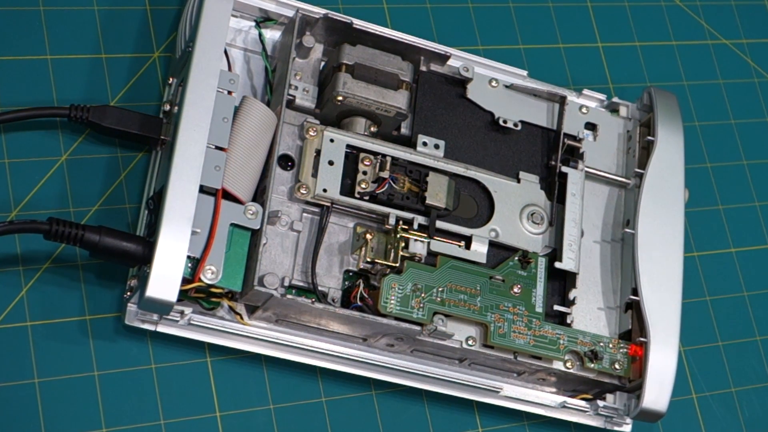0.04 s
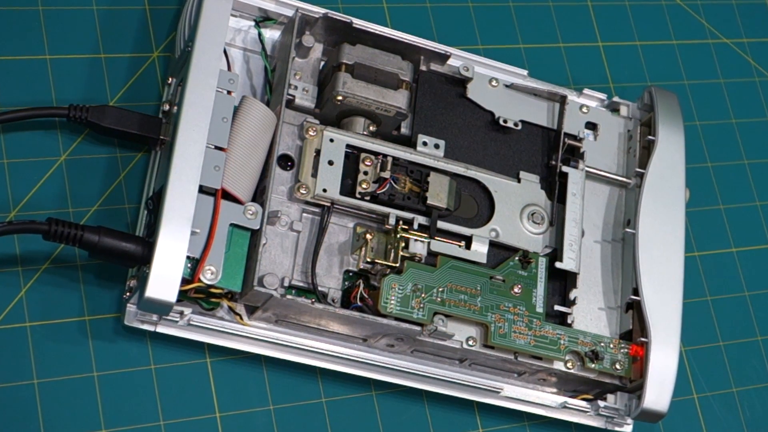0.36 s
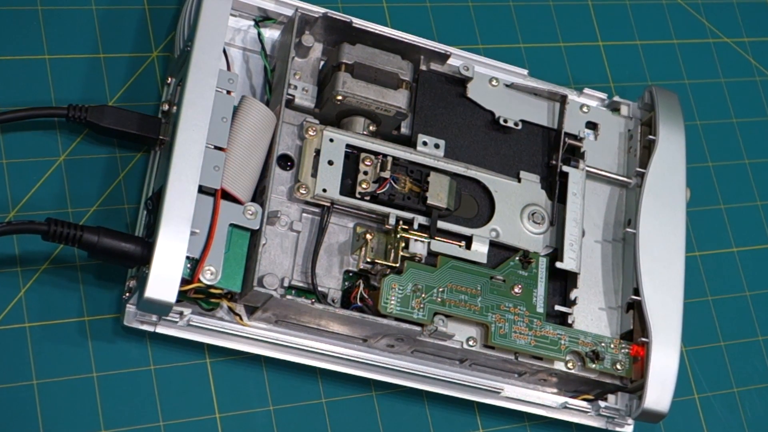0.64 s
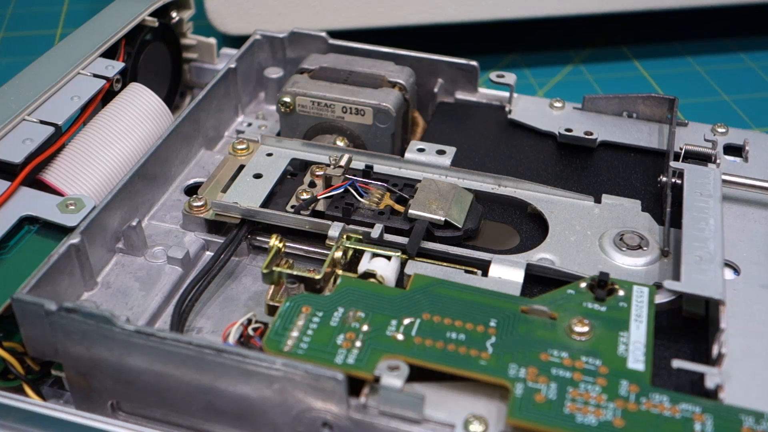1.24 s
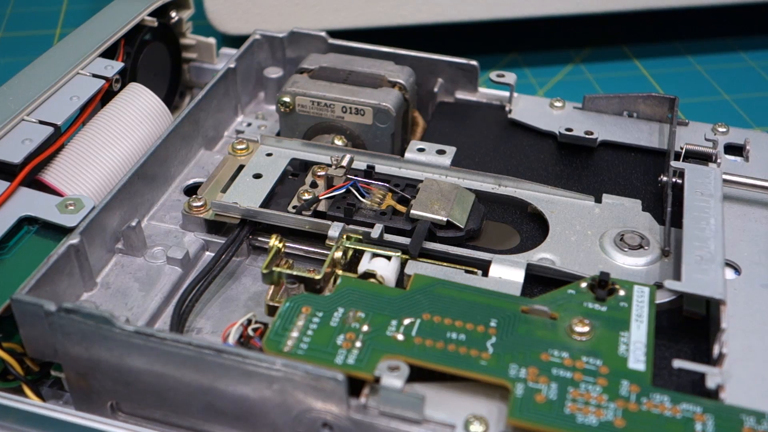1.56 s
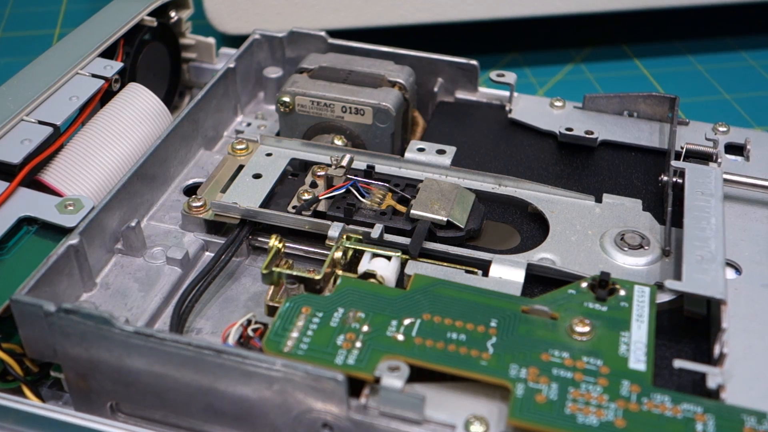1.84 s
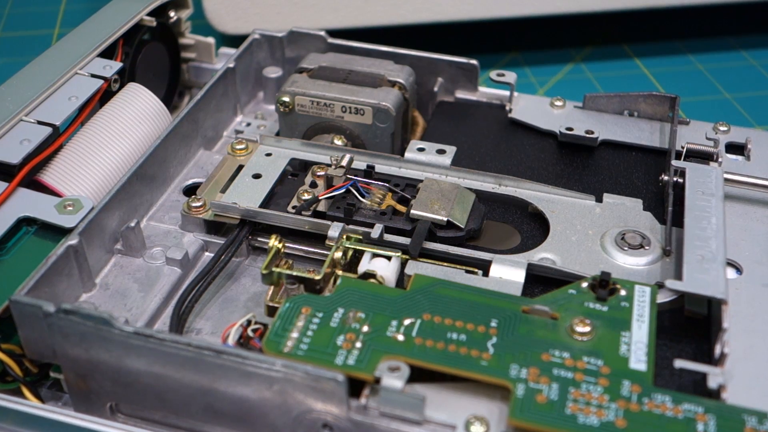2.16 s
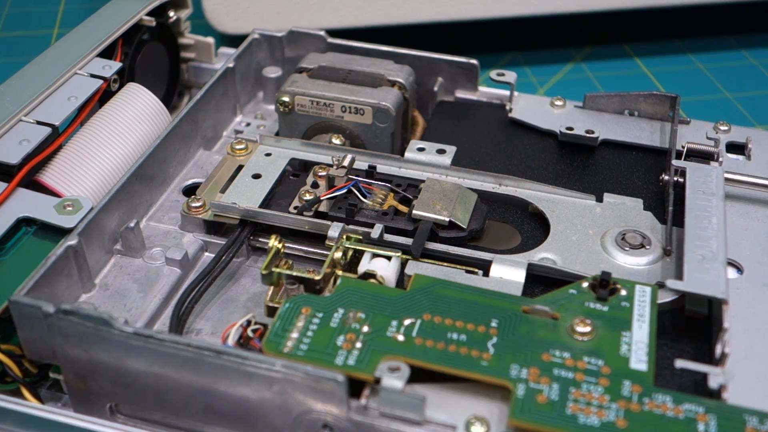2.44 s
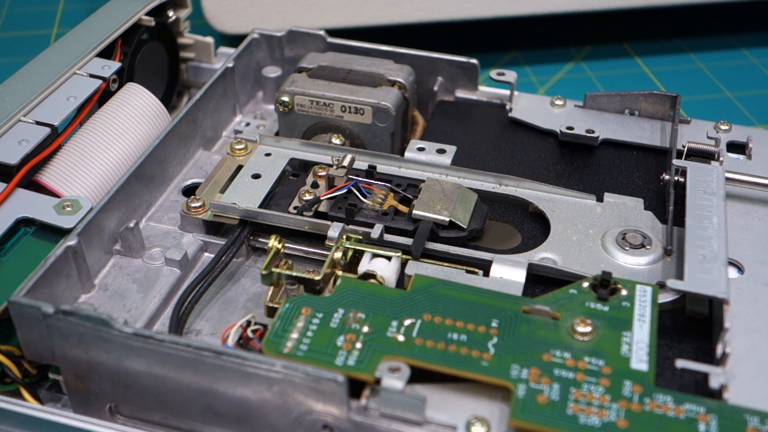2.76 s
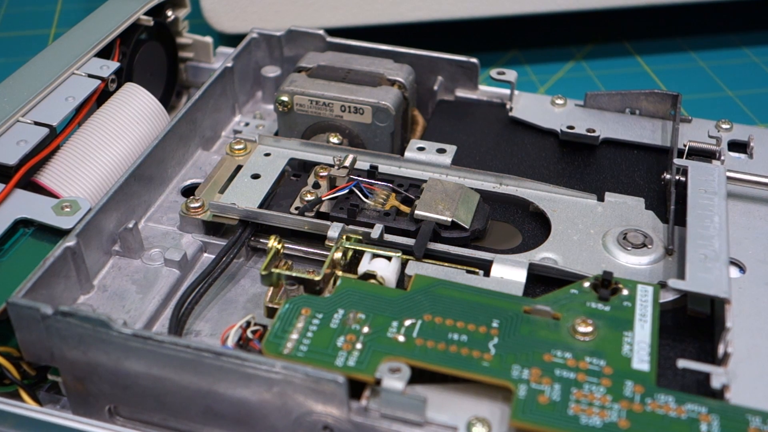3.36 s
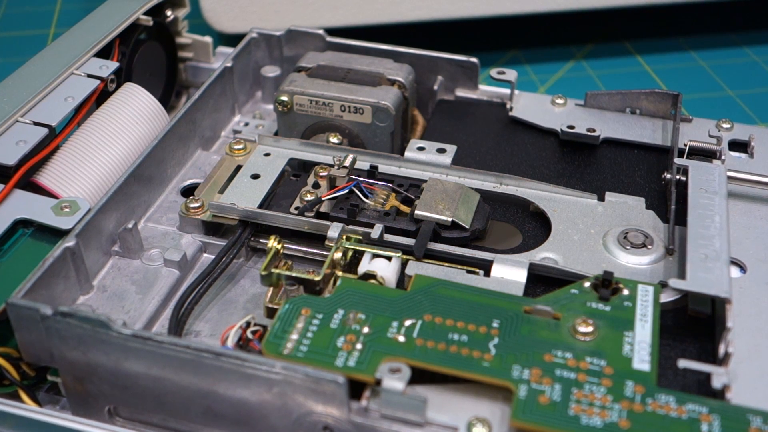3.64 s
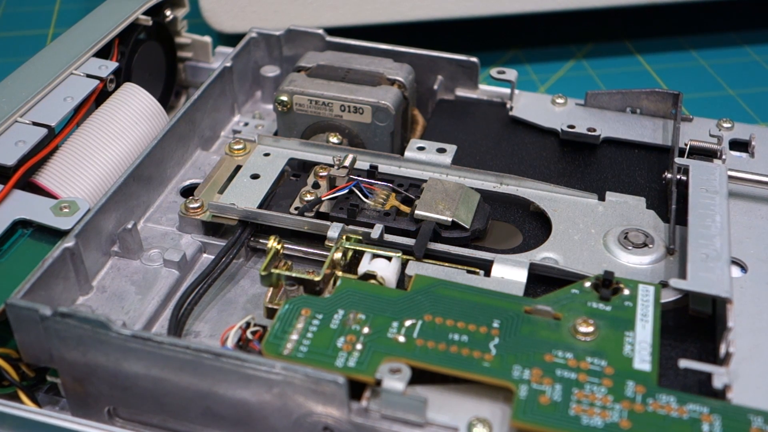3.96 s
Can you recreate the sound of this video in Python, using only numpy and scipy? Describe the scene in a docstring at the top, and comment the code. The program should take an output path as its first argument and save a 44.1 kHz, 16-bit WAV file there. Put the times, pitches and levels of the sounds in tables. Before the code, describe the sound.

An open floppy disk drive whirs with fast knocking and four head-step clacks.

```python
"""A fast knocking over a whirring belt is heard first: an open floppy disk drive, running close by.
The motor knocks into the chassis once a turn. The belt's rough patches come round every lap,
and the disk rubs in its jacket with every turn of the spindle. Four times there is a clack as
the stepper motor jerks the head carriage on by one track. Low room rumble lies underneath."""
import sys
import numpy as np
from scipy import signal
from scipy.fft import rfft, irfft, next_fast_len
from scipy.io import wavfile
from scipy.ndimage import map_coordinates

SR = 44100
rng = np.random.default_rng(int(sys.argv[2]) if len(sys.argv) > 2 else 0)


def to_wav(s):
    """Save 16-bit WAV."""
    ch = np.atleast_2d(s).T  # columns
    pcm = np.round(np.clip(ch, -1, 1) * 32767)  # PCM
    wavfile.write(sys.argv[1], SR, pcm.astype(np.int16))


N = 176400

MOTOR_HZ = 32.308  # turns a second
BELT_HZ, SPINDLE_HZ = MOTOR_HZ / 9, MOTOR_HZ * 5 / 27
FIRST_KNOCK_S, REBOUND_S = .0136, .016  # a rebound follows each knock by about half a turn

# A "colour" says which pitches come out stronger or weaker than the rest.
# room rumble and hiss: pitch_hz, level_db
ROOM_COLOUR = [(20, -26), (32, -10.5), (44, 2.5), (62, -6), (90, -4.5), (115, -10), (165, -10.5),
               (205, -7.5), (260, -10), (700, -17), (1800, -31.5), (4500, -37.5), (6000, -50), (8500, -49),
               (9700, -46), (10800, -51.5), (12300, -48), (14000, -62), (15500, -66)]
# the disk rubbing in its jacket: pitch_hz, level_db
JACKET_COLOUR = [(200, -15), (330, 0), (700, -3.5), (950, 1), (1150, -9.5), (1550, -20), (1780, -18),
                 (2100, -10.5), (2450, 0), (3100, -19.5), (3650, -27), (3780, -18.5), (3950, -30),
                 (4350, -26.5), (4700, -20.5), (5200, -22.5), (5800, -33.5), (8500, -40), (9700, -34.5),
                 (11000, -54), (15000, -47)]
# the belt running over its pulleys: pitch_hz, level_db
BELT_COLOUR = [(150, -54.5), (280, -19.5), (335, -1.5), (365, -9.5), (398, 0.5), (430, -8), (452, -6.5),
               (475, -10.5), (495, -13), (523, -1), (550, -12), (600, -4), (645, -9), (675, -21),
               (770, -19.5), (820, -5.5), (890, -7.5), (1020, -10.5), (1100, -27), (2000, -57.5),
               (8000, -94.5)]
# the motor's brushes: pitch_hz, level_db
BRUSH_COLOUR = [(300, -50), (600, -25), (850, 7.5), (1030, 7.5), (1120, -5.5), (1600, -5), (1720, -16.5),
                (2060, -4), (2210, -4), (2420, 4), (2590, 0.5), (2720, -12.5), (3050, -11), (3400, -22.5),
                (4700, -30), (5800, -31.5), (15000, -51.5)]
# the chassis when knocked: pitch_hz, level_db
CHASSIS_COLOUR = [(200, -48.5), (320, -10), (600, -13), (690, -33.5), (770, -21), (815, -3), (875, 1),
                  (940, -5.5), (1030, -11), (1090, -29.5), (1700, -40.5), (2450, -31), (3000, -53),
                  (6000, -80.5), (15000, -100)]
# the head carriage when tapped: pitch_hz, level_db
CARRIAGE_COLOUR = [(60, -8), (190, 3.5), (290, -18), (600, 2.5), (900, -2), (1180, -13), (1280, -5),
                   (1420, -1.5), (1750, -11), (2060, 1.5), (2300, -1), (2900, -18), (3600, -8), (4100, -16),
                   (4600, -12.5), (5500, -31.5), (9000, -33), (15000, -55)]
# the carriage scraping along its rails: pitch_hz, level_db
RAIL_COLOUR = [(60, -3), (190, 8.5), (290, -0.5), (600, -20), (900, 5.5), (1450, 0.5), (1750, -13.5),
               (2100, -5), (2900, -17), (4600, -25), (5800, -45), (15000, -64)]
# tones of belt and motor: rough_pitch_hz, start_level_db, growth_db_per_s
RUNNING_TONES = [(398, -49.5, -6), (402, -38, -2), (453.5, -50.5, -3), (452, -46.5, 3.44), (518.7, -47, 3),
                 (525.5, -44, -1), (528.7, -48, 0.5), (597, -43.5, -0.5), (610, -48.5, 2), (822, -41.5, -3),
                 (870.8, -40.5, 0), (872.3, -50, 3), (881, -45, 2.5), (2570, -60.5, 1.5)]
# knock strength on the nine motor turns of one belt lap: extra_db
LAP_ACCENTS = [3.5, 7, 3.5, 1.5, -2.5, 2.5, 2, 5, -0.5]
# knocks that are harder or softer than usual: near_time_s, extra_db
ODD_KNOCKS = [(.324, -19), (.355, 7), (.572, 8), (.603, -5), (.726, 11), (.85, 6), (.882, -4), (.913, 7),
              (1.006, 5.5), (1.161, -7), (1.562, 6), (1.87, 5), (2.055, 5), (2.088, 9.5), (2.149, 3),
              (2.428, 5), (2.49, 9), (2.552, -5), (2.706, 5), (2.737, 4.5), (2.768, 6.5), (2.83, -2),
              (2.892, 9), (3.016, 3.5), (3.046, 11.5), (3.294, 3), (3.386, 2), (3.419, 7), (3.573, 7.5),
              (3.666, 1), (3.728, 8), (3.851, 4), (3.881, 10.5)]
# moves of the head: start_s, kick_db, rattle_db, stop_db, thump_db, ring_db
HEAD_STEPS = [(.4935, 2.5, -28, 6, -25, -38), (1.328, -3, -27.5, -10, -24.5, -45),
              (2.329, -0.5, -28.5, -1, -24.5, -45), (3.1645, 1, -27.5, 4.5, -25.5, -51)]
# low notes of the case rocking after a step: pitch_hz, level_db, fade_s (time to fall 60 dB)
CASE_NOTES = [(77.5, -4, 0.13), (108.6, 3.5, 0.24), (134.7, -9.5, 0.33), (173, -28, 0.046),
              (192, -7.5, 0.16)]


def amp(db):
    """Turn decibels into a multiplier."""
    return 10 ** (np.asarray(db) / 20)


def unit(x):
    """Scale a sound to an average power of 1."""
    return x / np.sqrt(np.mean(x ** 2) + 1e-20)


def clock():
    """The time of each sample, in seconds."""
    return np.arange(N) / SR


def wobble(rate):
    """A smooth curve through rate random points a second."""
    return map_coordinates(rng.standard_normal(int(N * rate / SR) + 4), [clock() * rate])


def through(x, colour, size=16384):
    """Play x through an object with the given colour."""
    hz, db = np.transpose(colour)
    log_hz = np.log(np.fft.rfftfreq(size, 1 / SR) + 1)
    log_gain = np.log(amp(np.interp(log_hz, np.log(np.sort(hz)), db)))
    # work out how the object answers one tap, with no sound before the tap
    cepstrum = irfft(log_gain) * (1 + np.sign(size // 2 - np.arange(size)))
    answer = irfft(np.exp(rfft(cepstrum)))[:size // 2]
    return signal.fftconvolve(x, answer / np.linalg.norm(answer))[:N]


def surface(rate, fresh):
    """Roughness that comes round rate times a second; fresh is the share of new noise."""
    size = round(SR / rate)
    lap = irfft(np.exp(2j * np.pi * rng.random(size // 2 + 1)), size)
    return np.sqrt(1 - fresh) * unit(np.resize(lap, N)) + np.sqrt(fresh) * rng.standard_normal(N)


def passing(rate, first_s, width_s):
    """A bump from 0 to 1 and back, once a turn."""
    away_s = (((clock() - first_s) * rate + .5) % 1 - .5) / rate
    return np.exp(-.5 * (away_s / width_s) ** 2)


def add(track, start_s, sound):
    """Mix a sound into a track at start_s."""
    part = track[max(0, round(start_s * SR)):][:len(sound)]
    part += sound[:len(part)]


def frame(x, level_db=-1.5, fade_s=.06):
    """The metal frame's many small vibrations add a short ring."""
    t = np.arange(SR // 8) / SR
    tail = rng.standard_normal(len(t)) * amp(-60 * t / fade_s)
    ring = signal.fftconvolve(x, tail / np.linalg.norm(tail))[:N]
    gain = amp(level_db)
    return (x + gain * ring) / np.sqrt(1 + gain ** 2)


def room():
    """Low rumble and faint hiss."""
    return amp(-42) * unit(through(rng.standard_normal(N), ROOM_COLOUR))


def spindle(drag_s=.1368, swell_db=8.5, bend_hz=13, bend_lag_s=.0296):
    """The spindle's hum swells, then peaks in pitch, each turn as the disk drags in its jacket."""
    turn = lambda peak_s: np.cos(2 * np.pi * SPINDLE_HZ * (clock() - peak_s))
    hz = 55 * SPINDLE_HZ + bend_hz * turn(drag_s + bend_lag_s)
    hum = amp(swell_db * turn(drag_s) + wobble(6.5)) * np.sin(2 * np.pi * np.cumsum(hz) / SR)
    rub = surface(SPINDLE_HZ, fresh=.4) * amp(1.05 * turn(.18))
    return amp(-36.5) * unit(hum) + amp(-43) * unit(through(frame(rub), JACKET_COLOUR))


def belt():
    """The belt is tugged at each knock and each rebound; its joint bumps once a lap."""
    tug_db = 7 * passing(MOTOR_HZ, FIRST_KNOCK_S, width_s=.0031)
    tug_db += 5.1 * passing(MOTOR_HZ, FIRST_KNOCK_S + REBOUND_S, width_s=.0018)
    joint_db = 4.4 * passing(BELT_HZ, first_s=.0505, width_s=.0071)
    whirr = surface(BELT_HZ, fresh=.051) * amp(tug_db + joint_db)
    return amp(-32.5) * unit(through(whirr, BELT_COLOUR))


def motor():
    """Motor and belt hum with wavering loudness; the brushes scrape hardest at each knock."""
    t = clock()
    tones = np.zeros(N)
    for rough_hz, start_db, growth in RUNNING_TONES:
        hz = round(rough_hz / BELT_HZ) * BELT_HZ  # a whole number of waves per belt lap
        level_db = start_db + growth * t + wobble(3.21)
        tones += amp(level_db) * np.sin(2 * np.pi * (hz * t + rng.random()))
    scrape = rng.standard_normal(N) * amp(6.9 * passing(MOTOR_HZ, FIRST_KNOCK_S, width_s=.0034))
    return tones + amp(-40) * unit(through(frame(scrape), BRUSH_COLOUR))


def knocks(base_db=-9.5, scatter_db=.5, rebound_db=-8.5):
    """The motor knocks the chassis and rebounds each turn, harder or softer along the belt."""
    count = int(N / SR * MOTOR_HZ)
    times = FIRST_KNOCK_S + np.arange(count) / MOTOR_HZ
    levels_db = base_db + np.resize(LAP_ACCENTS, count) + scatter_db * rng.standard_normal(count)
    for near_s, extra_db in ODD_KNOCKS:
        levels_db[np.argmin(abs(times - near_s))] += extra_db
    # tiny slips in timing, the same on every lap
    slips_s = np.resize(rng.normal(0, .00036, (len(LAP_ACCENTS), 2)), (count, 2))
    blows = np.zeros(N)
    for start_s, db, (knock_slip, rebound_slip) in zip(times, levels_db, slips_s):
        add(blows, start_s + knock_slip, amp([db]))
        add(blows, start_s + REBOUND_S + rebound_slip, amp([db + rebound_db]))
    return through(blows, CHASSIS_COLOUR)


def head_steps(stop_s=.0135, bounce_s=.022, tick_count=6, tick_span_s=.012):
    """The stepper kicks; the carriage scrapes, ticks, stops and bounces; the case rocks, steel rings."""
    t = np.arange(SR // 2) / SR
    blows, scrapes, ticks, rings = np.zeros((4, N))
    rise_s, hold_s, fade_s = .0046, .011, .1
    scrape_shape = np.minimum(t / rise_s, 1) * amp(-60 * np.maximum(t - rise_s - hold_s, 0) / fade_s)
    note = lambda hz, fade_s: np.sin(2 * np.pi * hz * t) * amp(-60 * t / fade_s)
    thump = sum(amp(db) * note(hz, fade) for hz, db, fade in CASE_NOTES)
    thump *= 1 - np.exp(-t / .0024)  # the case takes a moment to start rocking
    steel_ring = note(hz=3780, fade_s=.12)
    for start_s, kick_db, rattle_db, stop_db, thump_db, ring_db in HEAD_STEPS:
        add(blows, start_s, amp([kick_db]))
        add(blows, start_s + stop_s, amp([stop_db]))
        add(scrapes, start_s + bounce_s, amp([kick_db - 3]))
        add(scrapes, start_s + .001, amp(rattle_db) * scrape_shape * rng.standard_normal(len(t)))
        for place in (np.arange(tick_count) + rng.random(tick_count)) / tick_count:
            tick = rng.choice([-1, 1]) * amp([rattle_db + 17 + rng.normal(0, 3.1)])
            add(ticks, start_s + .0071 + place * tick_span_s, tick)
        add(rings, start_s + .0057, -amp(thump_db) * thump)
        add(rings, start_s + stop_s, amp(ring_db) * steel_ring)
    rattle = through(frame(scrapes), RAIL_COLOUR) + through(frame(ticks), CARRIAGE_COLOUR)
    return through(blows, CHASSIS_COLOUR) + rattle + rings


def scene():
    """The drive and the room, mixed into one channel."""
    return (knocks() + motor() + belt() + spindle() + head_steps() + room())[None]


def record(dry, top_hz=15700):
    """Cut away all treble above top_hz."""
    size = next_fast_len(N + SR // 2)
    kept = np.fft.rfftfreq(size, 1 / SR) < top_hz
    return irfft(rfft(dry, size) * kept, size)[:, :N]


dry = scene()
out = record(dry)
to_wav(out)
```